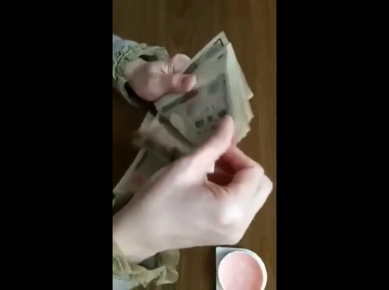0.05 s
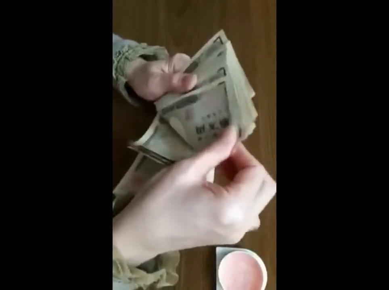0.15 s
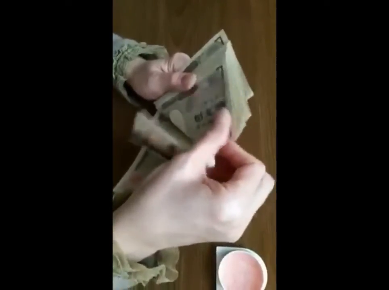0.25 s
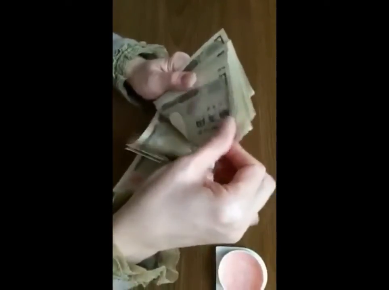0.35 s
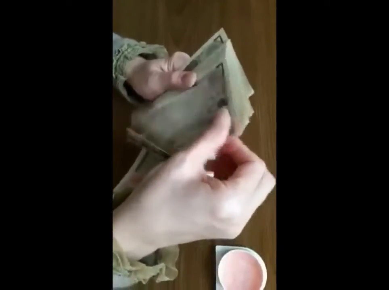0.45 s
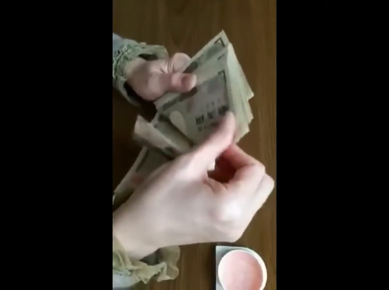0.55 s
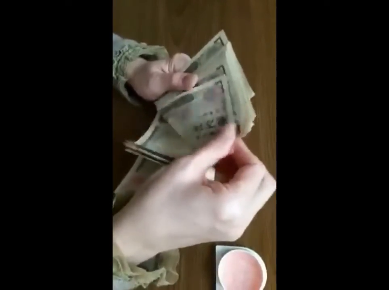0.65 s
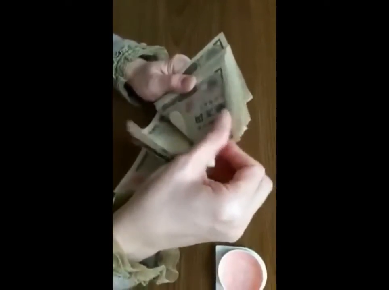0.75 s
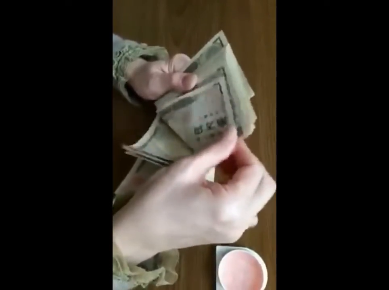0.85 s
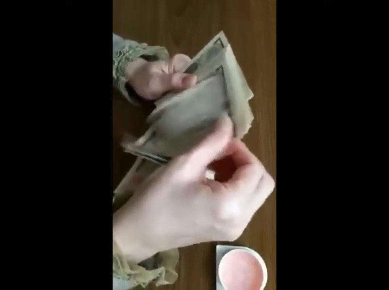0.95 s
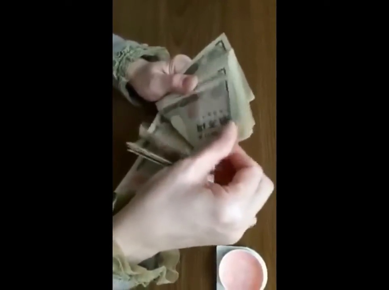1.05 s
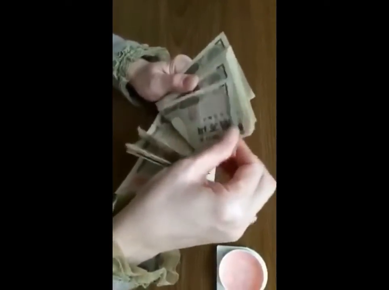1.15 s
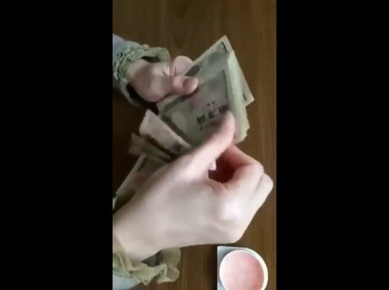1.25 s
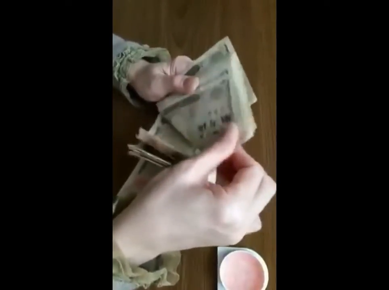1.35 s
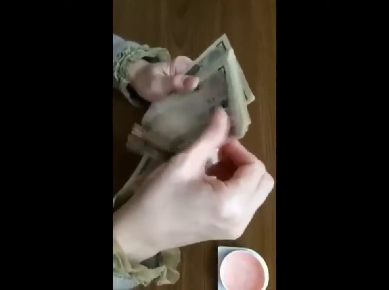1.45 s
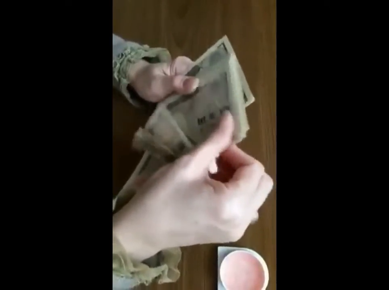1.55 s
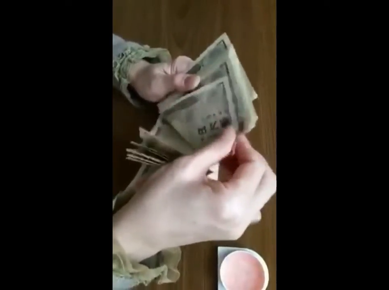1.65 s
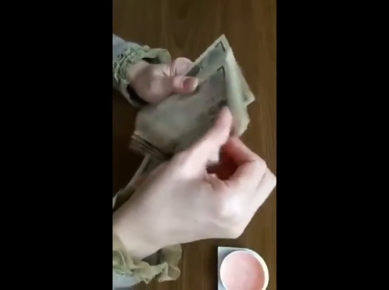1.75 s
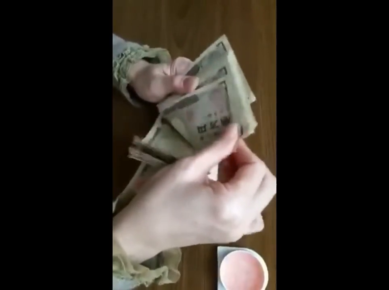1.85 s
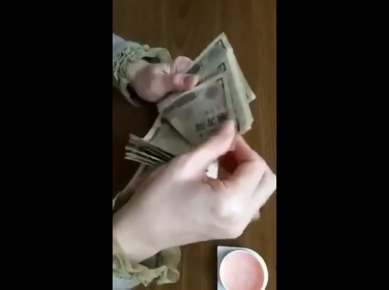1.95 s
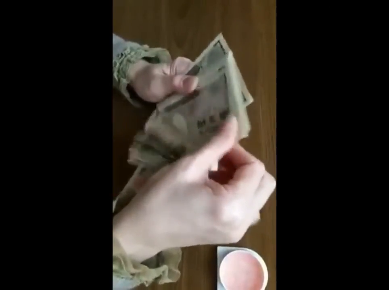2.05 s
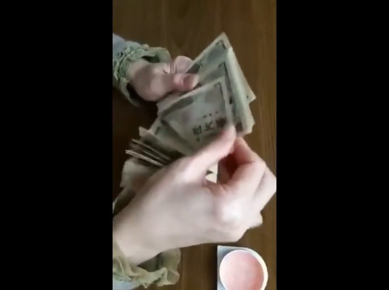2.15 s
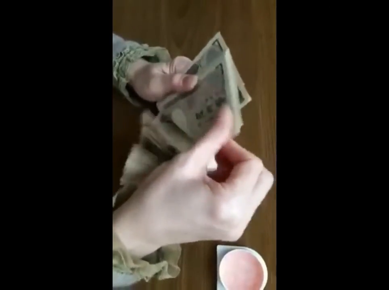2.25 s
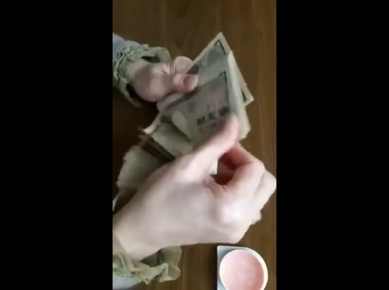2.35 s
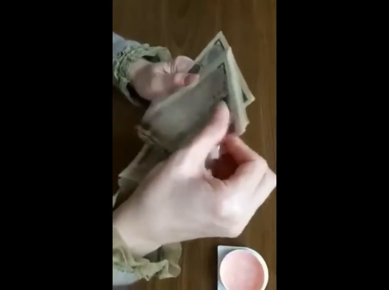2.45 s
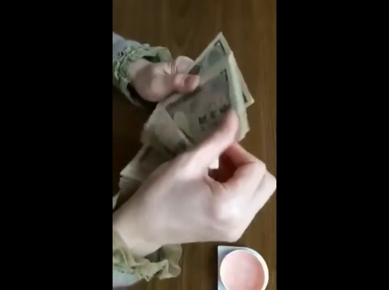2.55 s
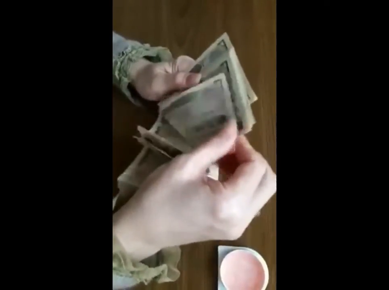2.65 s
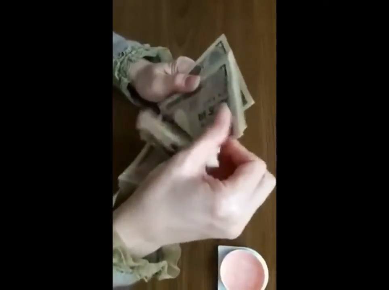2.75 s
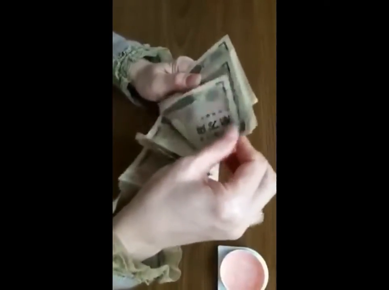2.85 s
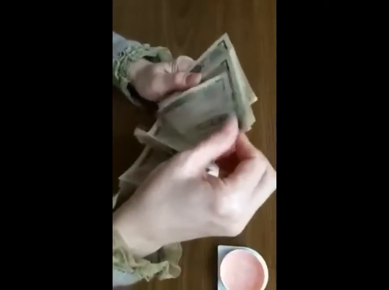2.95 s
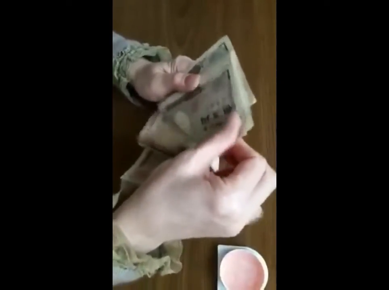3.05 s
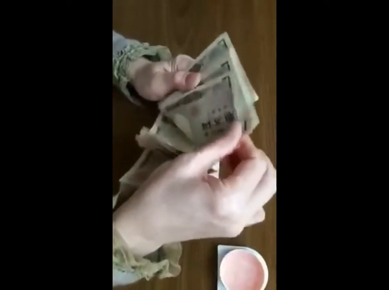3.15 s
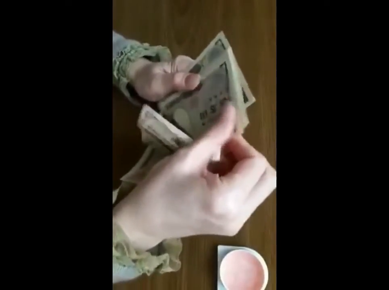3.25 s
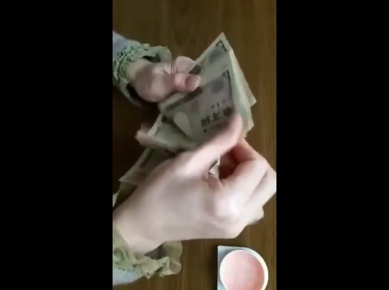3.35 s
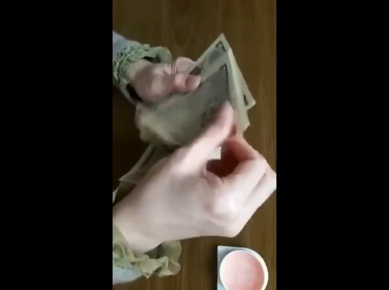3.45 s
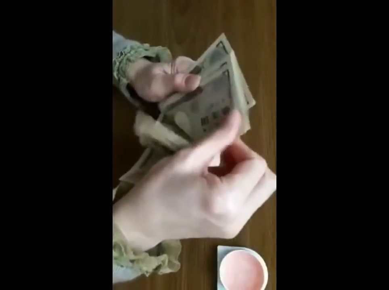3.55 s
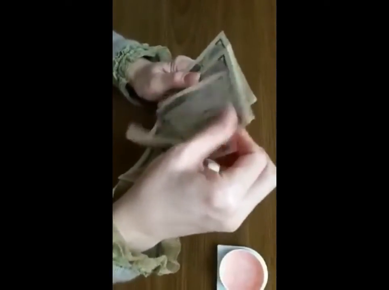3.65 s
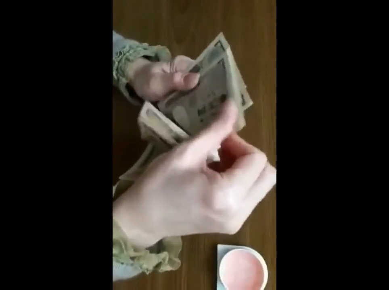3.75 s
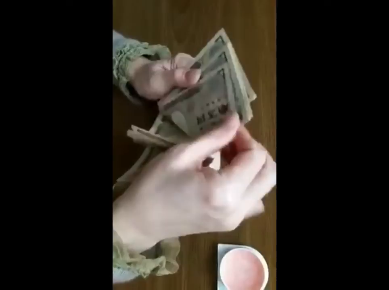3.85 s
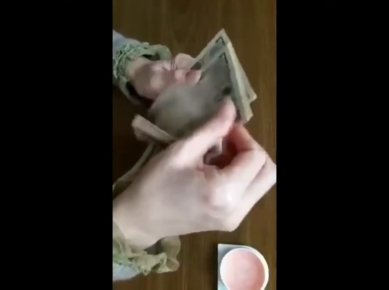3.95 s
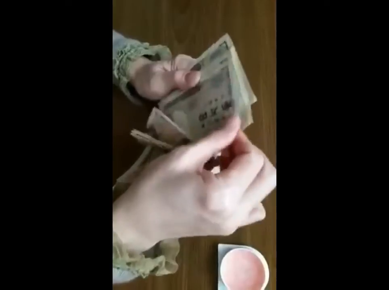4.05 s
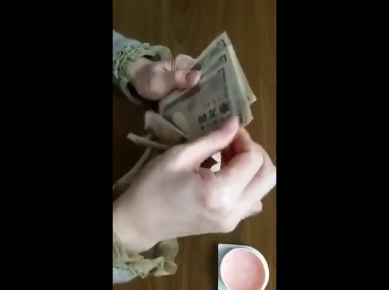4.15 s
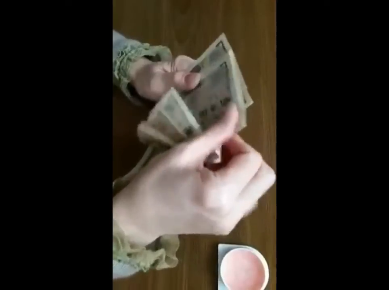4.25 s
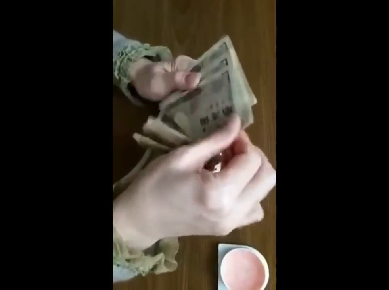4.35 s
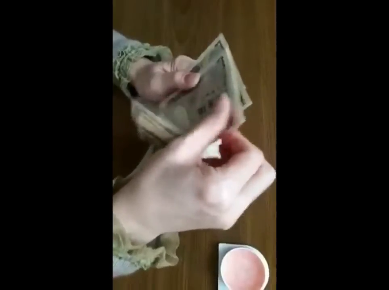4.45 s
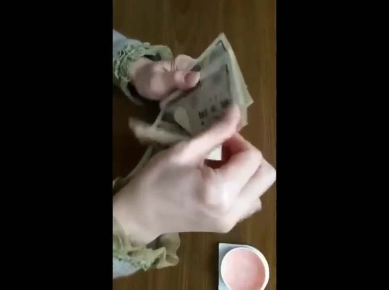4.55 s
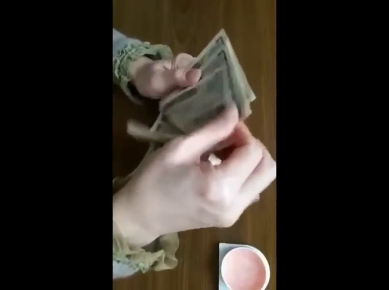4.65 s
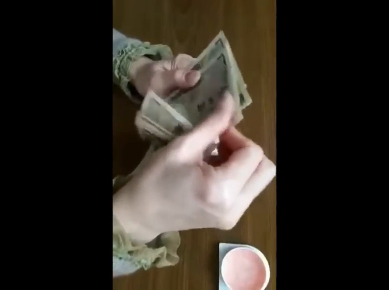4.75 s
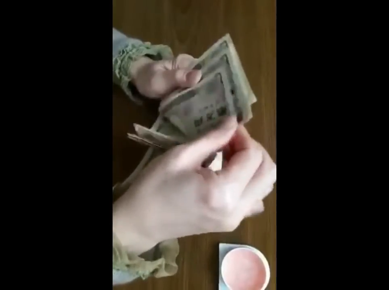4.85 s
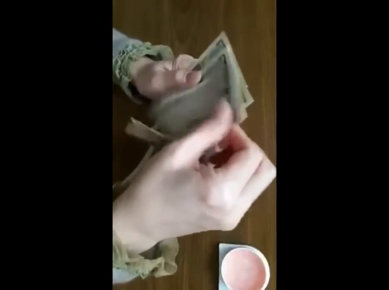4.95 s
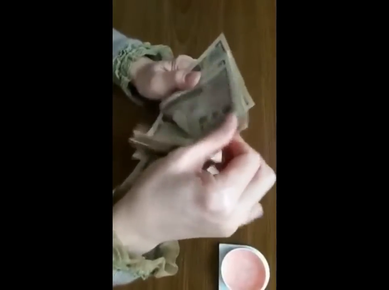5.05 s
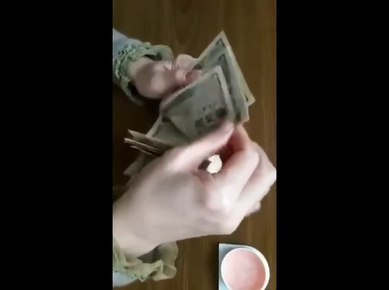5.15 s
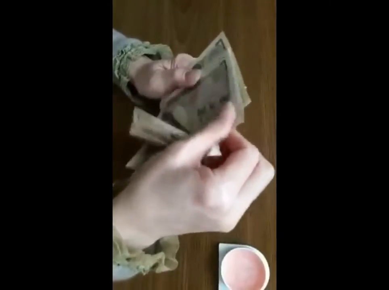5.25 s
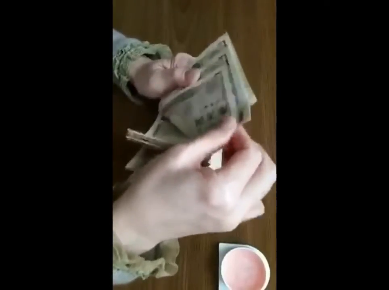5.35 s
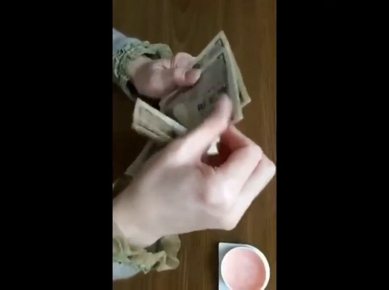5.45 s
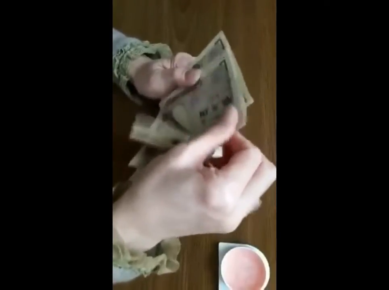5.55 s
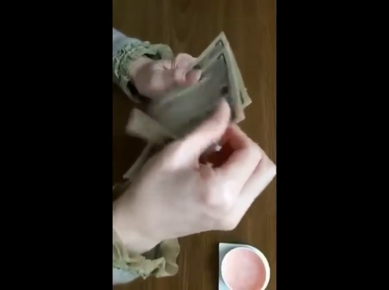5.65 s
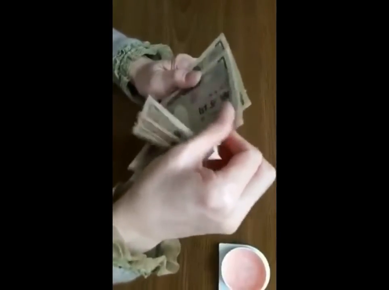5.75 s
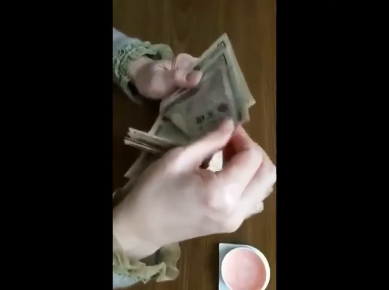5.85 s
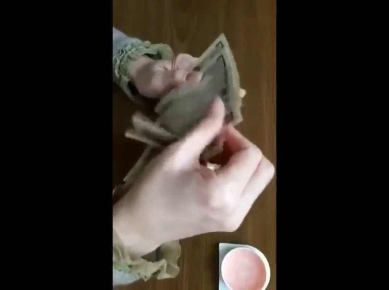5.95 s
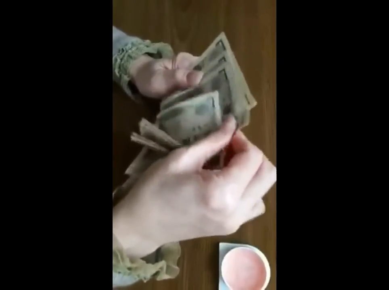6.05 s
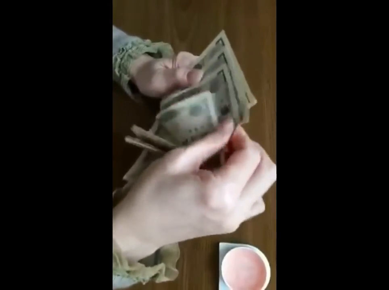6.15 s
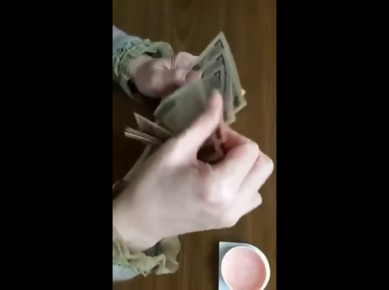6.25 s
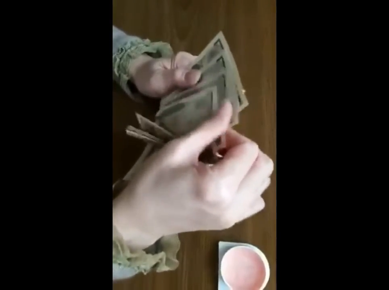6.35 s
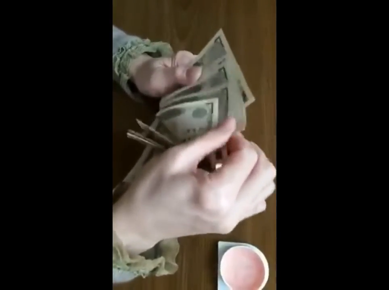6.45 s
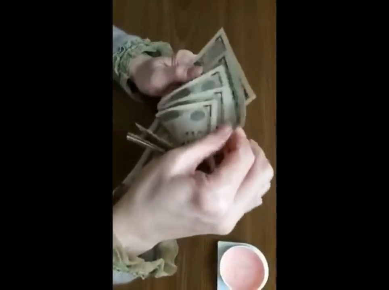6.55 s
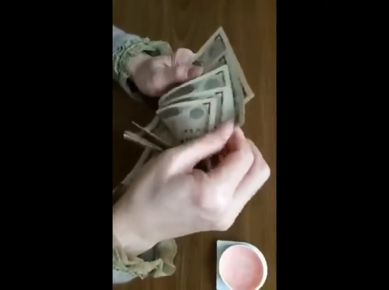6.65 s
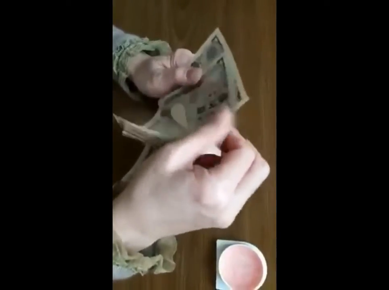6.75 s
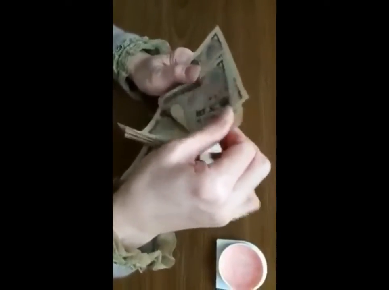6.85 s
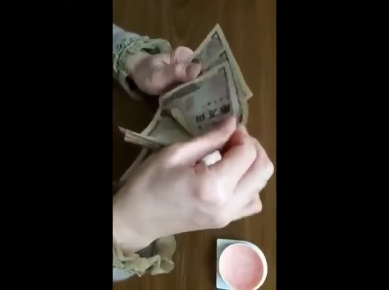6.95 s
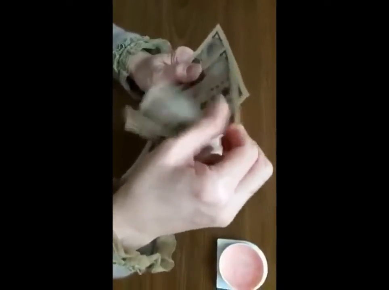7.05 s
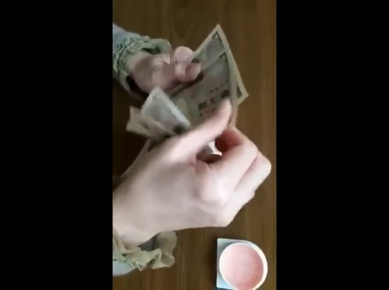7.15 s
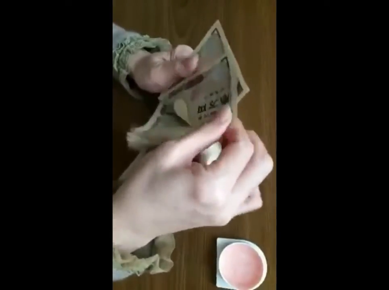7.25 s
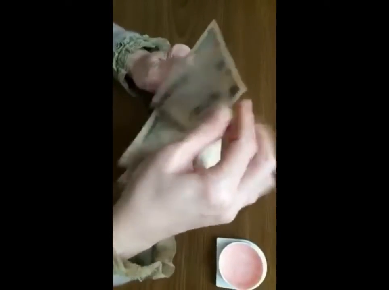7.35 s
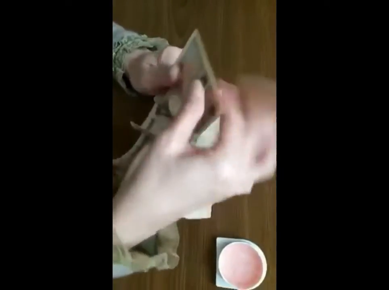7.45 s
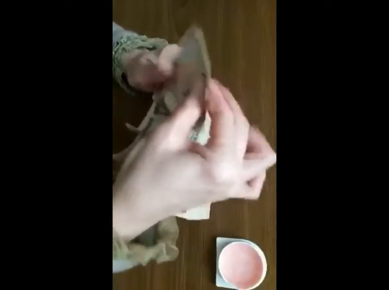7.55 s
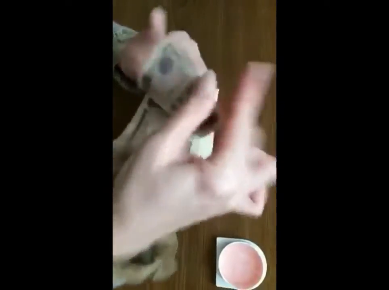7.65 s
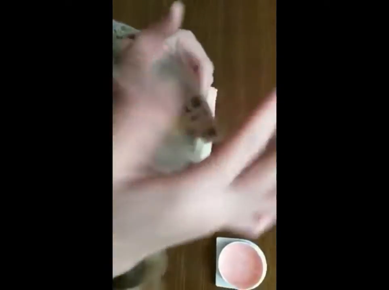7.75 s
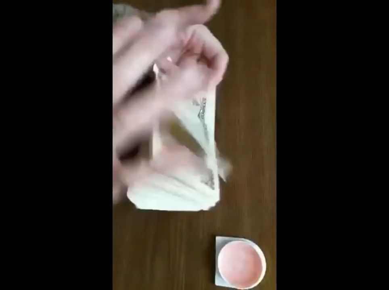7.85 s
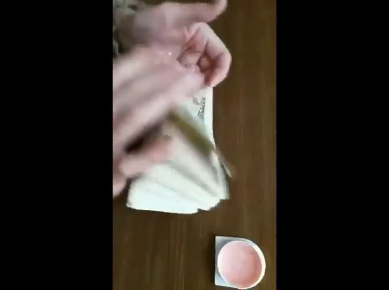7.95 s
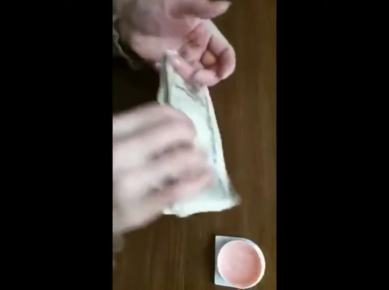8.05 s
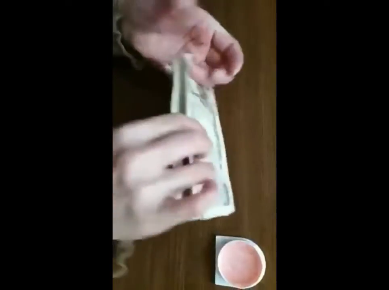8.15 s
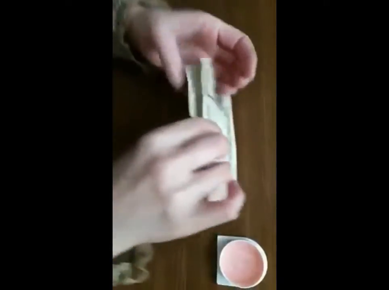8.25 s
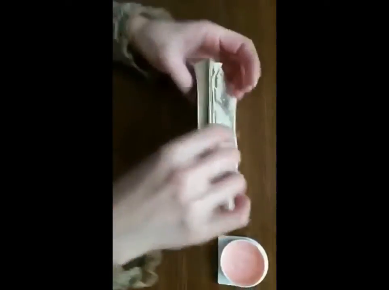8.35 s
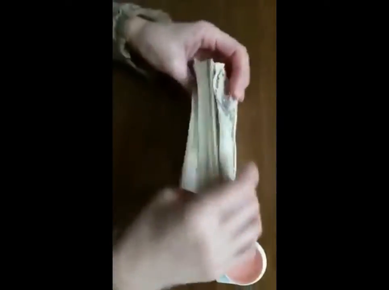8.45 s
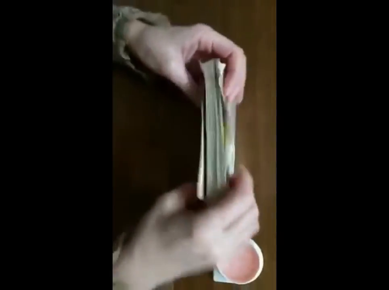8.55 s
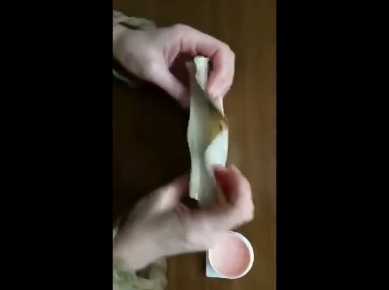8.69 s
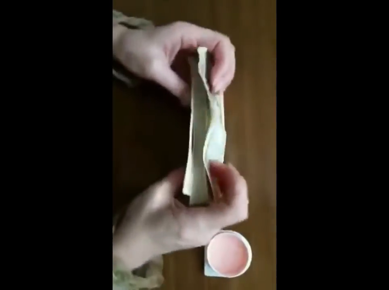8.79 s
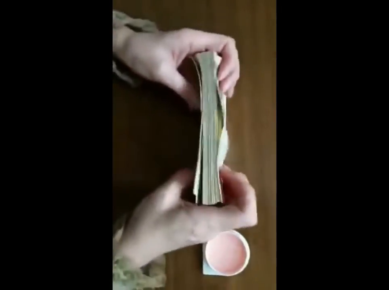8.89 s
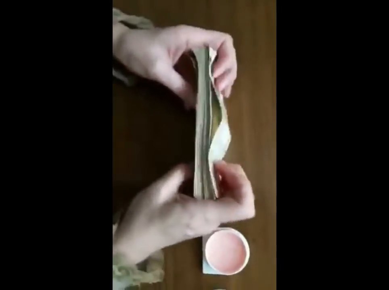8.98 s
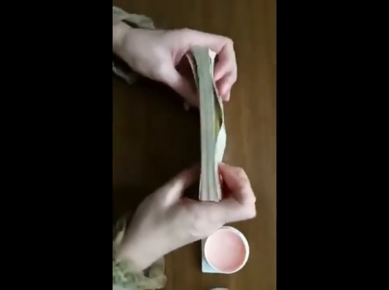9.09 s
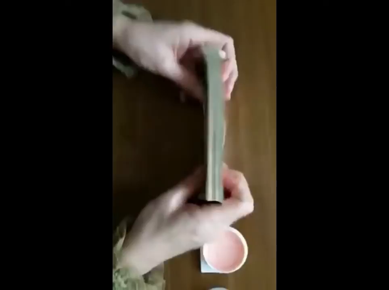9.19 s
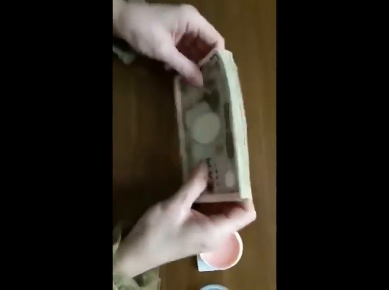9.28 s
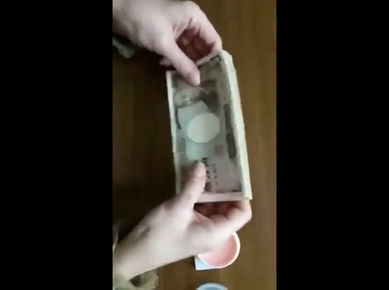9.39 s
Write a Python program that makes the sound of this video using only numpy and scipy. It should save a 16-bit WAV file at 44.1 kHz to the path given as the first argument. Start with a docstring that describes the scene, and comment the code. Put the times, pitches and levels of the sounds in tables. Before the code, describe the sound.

Paper notes are thumbed off a fan in a quick, steady rhythm of dry hisses and dull flexing, dotted with sharp little flicks. After several seconds the rhythm slows, the bundle is slapped together with a loud crackling pop and a puff of air, then its edge is knocked on a wooden table in two short clusters. Close stereo microphone in a small room, hands slightly nearer the left.

```python
"""Banknotes are counted by hand over a wooden table in a small room, about four notes a second.
The thumb slides each note off the fan and draws back: hiss, rasp and dull flexing; notes flick free with pulses.
Then the bundle is slapped together, with pops, crackle and one puff of air,
and its edge is knocked square on the table, whose wooden modes ring.
Hands, sleeves and held paper rub and rustle beneath; decaying noise makes the room's reflections."""
import sys
import numpy as np
from scipy import signal
from scipy.fft import rfft, irfft, next_fast_len
from scipy.io import wavfile

SR = 44100
rng = np.random.default_rng(int(sys.argv[2]) if len(sys.argv) > 2 else 0)


def output_pcm(signal):
    """Save a mono or channel-first signal as 16-bit PCM at the path in sys.argv[1].

    Samples are clipped to [-1, 1] before scaling.
    """
    pcm = np.clip(np.atleast_2d(signal).T, -1, 1) * 32767
    wavfile.write(sys.argv[1], SR, np.round(pcm).astype(np.int16))


N = 415422
RIGHT_LAG_S = 0.00015   # the right port hears the hands later

# The thumb pushes a note off the fan or draws back. Each row: middle of the stroke in seconds,
# hiss in dB before trim, length in seconds, flexing in dB before trim, brightness in dB,
# rasp in dB relative to the usual rasp.
STROKES = [(0.008, -36, 0.048, -48.5, -5, -2), (0.105, -45, 0.071, -48, 1.5, 0),
           (0.23, -42.5, 0.085, -45, 1.5, 2), (0.336, -49.5, 0.096, -57, -2, 2),
           (0.477, -41, 0.071, -49.5, -2.5, 3), (0.598, -44.5, 0.084, -54, -2.5, 1),
           (0.703, -43, 0.084, -46, 1.5, -7), (0.82, -46, 0.067, -53.0, 1.5, 4),
           (0.939, -39.0, 0.062, -40, 2.5, 0.5), (1.076, -43.5, 0.049, -51.5, -3.5, 0.5),
           (1.196, -44, 0.1, -45, 1.5, 2), (1.308, -48.5, 0.085, -50, -0.5, 5),
           (1.437, -43.0, 0.08, -46, -1.0, -1.5), (1.586, -46.5, 0.054, -51, -1, 3),
           (1.699, -44, 0.084, -50, -0.0, -1), (1.844, -45.5, 0.092, -54, 0.5, -0.5),
           (1.961, -45.5, 0.083, -45.5, 3.5, 6), (2.08, -48, 0.083, -53.5, -4, 1),
           (2.221, -48.5, 0.1, -50.0, 2.5, -0.5), (2.334, -45, 0.059, -43, 1.5, -6),
           (2.453, -44.5, 0.1, -49, 2.5, 1.5), (2.598, -45, 0.079, -46, 0, 5),
           (2.717, -42.5, 0.074, -49, -1.5, 4.5), (2.827, -45.5, 0.065, -51, 1, -3),
           (2.946, -40.5, 0.079, -46, -3.5, -4), (3.069, -43, 0.079, -48, 0.0, 0),
           (3.196, -45, 0.096, -49, 1.5, 4), (3.326, -46.0, 0.12, -53, -3, 1),
           (3.461, -43.5, 0.088, -45.5, 1.0, -4), (3.585, -51.5, 0.11, -66, -1, 2.5),
           (3.7, -41.0, 0.064, -45, 1, -5), (3.822, -47.5, 0.11, -50.5, -1, -1),
           (3.933, -41.0, 0.067, -43.5, 0.5, 0.5), (4.038, -45.5, 0.089, -52, -4.5, -2.0),
           (4.168, -44.5, 0.082, -54, -1.5, -4), (4.303, -46.5, 0.087, -50.5, -3, 1.5),
           (4.437, -45.5, 0.098, -46.5, 0.5, -3.5), (4.544, -46, 0.097, -54, -3, -3),
           (4.669, -38.5, 0.067, -45.5, -1, -3), (4.815, -46.5, 0.1, -47, -1.5, -1),
           (4.934, -47.5, 0.068, -51.5, 1.5, 0), (5.047, -38.5, 0.069, -44, -4, -2),
           (5.181, -47, 0.083, -48.5, 2.5, -6), (5.32, -42, 0.086, -50, 0, -5),
           (5.432, -42.5, 0.086, -55, -4, -2), (5.546, -48, 0.075, -47, 3, -2),
           (5.659, -40.5, 0.057, -44, 1, -2), (5.796, -43.5, 0.062, -50.5, 2, -3),
           (5.91, -45.5, 0.073, -50.5, 1.5, -1.0), (6.039, -49.5, 0.075, -52, 4, 6),
           (6.178, -46, 0.038, -64, 3, -5), (6.285, -44.5, 0.075, -55, 2, 5.5),
           (6.434, -42.5, 0.11, -44.0, -12, -2), (6.595, -50.5, 0.17, -53, -10, -8),
           (6.73, -38.5, 0.098, -58, -5.5, -5), (6.868, -50, 0.066, -47, -9, -1),
           (7.126, -43.5, 0.092, -56.5, 1.5, 2.5), (7.36, -54, 0.16, -62, -1, 1),
           (7.51, -47.5, 0.11, -54.5, -1, -1.5)]
# Colour of paper sliding on paper. Each row: frequency in Hz, relative level in dB per Hz.
HISS = [(300, -33), (1000, -8.5), (1800, 2), (2500, 5.5), (3200, 1), (4100, 5), (5500, -1.5), (8000, -4),
        (10000, -11.5)]
# Colour of a bending note. Each row: frequency in Hz, relative level in dB per Hz.
FLEX = [(100, -8.5), (300, -16.5), (600, 1), (1100, 4.5), (1600, 2.5), (2500, -3), (5000, -37),
        (10000, -35.5)]
# Rasp resonance of the sliding note: centre in Hz, width in Hz, usual boost in dB.
RASP = (2400, 710, 0.21)


def sliding_notes(hiss_db=-4.0, flex_db=-5.0, crease_db=1.28, catch_db=1.1, room_db=-3.0, bright_from_hz=5700):
    """Each stroke swells and fades in hiss, rasp and dull flexing; returns two parts of the sheet and their echoes."""
    t = np.arange(N) / SR
    out, echoes = np.zeros((2, 2, N))
    scrapes = [friction(per_s=1100, spread_db=2.5, smooth=0.43) * from_db(crease_db * drift(300)) for part in out]
    hiss = colour(scrapes, HISS)
    flex = colour([friction(per_s=260, spread_db=3.5, smooth=0.3) for part in out], FLEX)
    treble = signal.butter(2, bright_from_hz, "high", fs=SR, output="sos")
    sheen = signal.sosfiltfilt(treble, hiss)
    grip = from_db(catch_db * drift(60))   # the thumb catches and slips within a stroke
    rasp_hz, rasp_width, usual_rasp_db = RASP
    for s, level_db, length, bend_db, bright_db, rasp_db in STROKES:
        near = slice(max(0, int((s - 2 * length) * SR)), int((s + 2 * length) * SR))
        # about 10 dB down at half a length either side of the middle
        speed = grip[near] * np.exp(-((t[near] - s) / length * 2.15) ** 2)
        slide = (hiss - sheen)[:, near] + from_db(bright_db) * sheen[:, near]
        slide = boost(slide, rasp_hz * np.exp(0.084 * rng.normal()), rasp_width, usual_rasp_db + rasp_db)
        bend = from_db(bend_db + flex_db) * flex[:, near]
        note = sheet_colour(speed * (from_db(level_db + hiss_db) * slide + bend))
        out[:, near] += note
        # the fan shifts, so every note finds its own set of reflections
        add(echoes, near.start / SR, from_db(room_db) * room(note.sum(axis=0)))
    return out, echoes


def sheet_colour(x, shape_db=5.5):
    """Every note bends into a shape of its own, with new peaks and dips; the level stays."""
    level = np.std(x)
    for hz in np.geomspace(900, 5000, 5) * np.exp(rng.normal(0, .2, 5)):
        x = boost(x, hz, hz / 5, shape_db * rng.uniform(-2, 1))
    return level * rms_one(x)


def off_the_fan(x, bounce_s=.0006, swing_octaves=.6, share=.4):
    """The sound also bounces off the notes beneath; the gap opens and closes, so its colour sweeps."""
    n = np.arange(N)
    delay = bounce_s * SR * 2 ** (swing_octaves * drift(14))
    bounced = np.interp(n - delay, n, x)
    return (x + share * bounced) / np.hypot(1, share)


# A note flicks free loudly. Each row: time in seconds, pulse peak in dB, pitch in Hz.
FLICKS = [(0.0135, -37, 2600), (0.361, -36, 1410), (0.491, -32, 2360), (0.83, -39, 845), (1.435, -36, 675),
          (1.589, -39, 730), (2.193, -32, 1050), (2.424, -27, 1100), (2.667, -42, 990),
          (2.7985, -26.5, 1310), (2.8003, -53, 1350), (2.8215, -36, 1050), (2.83, -34, 1200),
          (3.0443, -29.5, 1090), (3.058, -34, 1100), (3.154, -41, 1100), (3.193, -33.5, 1100),
          (3.222, -40, 1050), (3.301, -30.5, 1090), (3.441, -33, 1050), (4.304, -35.5, 1010),
          (4.532, -32.5, 1030), (4.618, -35, 1070), (4.682, -37, 1120), (4.785, -26, 1000),
          (4.85, -38, 1100), (5.04, -33, 1200), (5.21, -37, 830), (5.242, -36.5, 1100), (5.545, -34, 755),
          (5.617, -36, 1070), (6.055, -31.5, 935), (6.113, -35, 840), (6.123, -55, 940), (6.188, -29, 2360),
          (6.349, -33, 880), (6.488, -44, 1290), (6.498, -29, 1190), (7.267, -32, 980), (7.348, -43.5, 620)]
# Colour of crackling paper, for ticks and slaps. Each row: frequency in Hz, relative level in dB per Hz.
CRACKLE = [(100, -1), (400, 2.5), (720, 4), (1000, 4.5), (1450, 5), (2000, 4.5), (2700, 4), (3800, 3),
           (5500, -4), (7700, -6.5), (10000, -13)]


def flicking_notes(snap_db=0.0, flutter_db=-17.5, flutter_s=0.0097, tick_db=-11, rebound_db=-11.5,
                   rebound_s=.008, crinkle_db=-19, crinkle_s=0.021):
    """A bending note crinkles, springs straight with a pulse and a tick, then bounces and flutters on the others."""
    t = np.arange(SR // 10) / SR
    snaps, flutter, ticks = np.zeros((3, N))
    for s, level_db, hz in list(FLICKS) + soft_flicks():
        crack = from_db(level_db + snap_db) * snap(hz, cycles=0.8)
        start = s - len(crack) / 2 / SR
        add(snaps, start, crack)
        delays = np.cumsum(rebound_s * rng.uniform(0.285, 1.6, size=3))
        for delay, chance in zip(delays, rng.standard_normal(size=3)):
            # louder rebounds are lower
            rebound = snap(hz * np.exp(-.15 * chance), cycles=0.73)
            add(snaps, start + delay, from_db(level_db + rebound_db + 2 * chance) * rebound)
        lead = t[t < s]
        add(flutter, s - lead[-1], from_db(level_db + crinkle_db) * np.exp(-lead[::-1] / crinkle_s))
        add(flutter, s, from_db(level_db + flutter_db) * np.exp(-t / flutter_s))
        add(ticks, s, from_db(level_db + tick_db) * np.exp(-t / 0.003))
    flutter = colour(flutter * friction(per_s=420, spread_db=1.0, smooth=0.65), FLEX)
    return snaps + flutter + colour(ticks * rng.standard_normal(N), CRACKLE)


def soft_flicks(chance=0.15, usual_db=-54.5, usual_hz=855, scatter_s=0.048, scatter_db=5.5, scatter_octaves=0.26):
    """Some strokes let a corner slip near the height of the movement; returns rows like FLICKS."""
    middles = [row[0] for row in STROKES]
    luck = rng.random(len(middles))
    spread = rng.standard_normal((len(middles), 3))
    flicks = []
    for s, draw, (shift, loud, high) in zip(middles, luck, spread):
        if draw < chance:
            hz = usual_hz * 2 ** (scatter_octaves * high)
            flicks.append((s + scatter_s * shift, usual_db + scatter_db * loud, hz))
    return flicks


def snap(hz, cycles):
    """A pressure pulse 1 high that swells and dies within about the given number of cycles, centred 5 ms in."""
    phase = np.arange(-SR // 200, SR // 200) / SR * hz
    return np.cos(2 * np.pi * phase) * np.exp(-(phase / cycles) ** 2)


# Notes slap together. Each row: time in seconds, pulse in dB, crackle in dB, crackle decay in seconds,
# left over right in dB, room feed in dB, low cut of the crackle in Hz.
SLAPS = [(6.9176, -20.5, -30.5, 0.023, 8, -6, 300), (7.261, -41, -36, 0.019, 2, -6.5, 300),
         (7.6432, -36, -20.5, 0.0015, 11, -5, 900), (7.6467, -26.5, -32, 0.0015, 8, -3, 300),
         (7.726, -30, -37.5, 0.0023, 4, 2.5, 600), (7.7371, -25, -24, 0.0028, 8.5, -13.5, 302),
         (7.8202, -19, -9, 0.0042, 6.5, -3, 118), (7.868, -46, -29, 0.014, 2, -8, 1000),
         (8.043, -53, -52.5, 0.0027, 3, 2.5, 2000), (8.178, -43, -32.5, 0.0026, 17, -1.5, 900),
         (8.237, -57, -50, .002, 0, -11, 1200), (8.2804, -39, -47.5, 0.014, -7, -4, 300),
         (8.308, -55, -39.5, 0.0024, -6, -5, 2500)]
# A harder slap closes a wider patch and sounds lower: the pitch at a usual level, and dB per octave down.
SLAP_HZ, SLAP_DB, SLAP_DB_PER_OCTAVE = 925, -26, 22


def slapping_notes(rise_s=0.00096, brush_db=-11, brush_s=0.00087, touch_s=0.0037, touch_db=-37, touch_decay_s=0.0025):
    """Sheets brush, then meet flat with a pressure pulse and crackle; returns direct sound and room feed."""
    t = np.arange(SR // 10) / SR
    direct, feed = np.zeros((2, N)), np.zeros(N)
    crack = colour(signal.unit_impulse(len(t)), CRACKLE)[0, :len(t)]
    grains = friction(per_s=3000, spread_db=2.0, smooth=.5)
    since_touch = np.r_[-t[::-1], t] + touch_s
    touch = (since_touch > 0) * np.exp(-np.abs(since_touch) / touch_decay_s)
    for s, pulse_db, crackle_db, decay, pan_db, room_db, low_hz in SLAPS:
        thin = signal.butter(1, low_hz, "high", fs=SR)   # a small patch of paper radiates little bass
        brush = from_db(brush_db) * np.exp(-t[::-1] / brush_s)
        impact = np.exp(-t / decay) * (1 - np.exp(-t / rise_s))
        force = from_db(crackle_db) * np.r_[brush, impact]
        if crackle_db > touch_db:   # only the firm slaps come corner first
            force = np.hypot(force, from_db(touch_db) * touch)
        burst = force * np.roll(grains, rng.integers(N))[:len(force)]
        burst = rms_one(burst) * np.std(force)
        crackle = signal.lfilter(*thin, colour(burst, CRACKLE)[0, :len(force)])
        pop_hz = SLAP_HZ * 2 ** ((SLAP_DB - pulse_db) / SLAP_DB_PER_OCTAVE)
        pop = from_db(pulse_db) * pulse(pop_hz, cycles=1.0)
        left, right = pan(pan_db) * (np.r_[0 * t, pop] + crackle)
        add(direct[0], s - t[-1], left)
        add(direct[1], s - t[-1] + RIGHT_LAG_S, right)
        # the room is fed one even crack with the energy of the crackle, so its reflections stay smooth
        even_crack = np.linalg.norm(force) * signal.lfilter(*thin, crack)
        add(feed, s, from_db(room_db) * (pop + even_crack))
    return direct, feed


# The hollow between palms and bundle. Each row: resonance in Hz, width in Hz, boost in dB.
PALM_MODES = [(718, 49, 2.2), (1970, 160, 3.7), (2380, 170, 3.8), (3480, 160, 4.4), (4450, 160, 4)]


def palm_ring(x):
    """The hollow between palms and bundle rings at its resonances."""
    for mode in PALM_MODES:
        x = boost(x, *mode)
    return x


# The hardest slap squeezes air out at the microphone: peak in dB, push length in seconds, left over right in dB.
PUFF = (-18.5, 0.0017, 30.6)


def air_puff(travel_s=0.0016):
    """A short push of air and a longer, weaker suction, close to the left port."""
    level_db, push_s, pan_db = PUFF
    s = max(SLAPS, key=lambda slap: slap[1])[0]
    out = np.zeros((2, N))
    age = 2 * np.arange(SR // 10) / SR / push_s
    swing = age * (2 - age) * np.exp(-age)   # turns to suction when the push length is over
    add(out, s + travel_s, from_db(level_db) * pan(pan_db) * swing / swing.max())
    return out


# The bundle lands on the table. Each row: time in seconds, knock in dB, contact cut-off in Hz,
# sheet edges in dB, reflections in dB.
TAPS = [(8.316, -40, 590, -68, 2.5), (8.448, -42, 202, -65, -12), (8.5036, -13.5, 560, -30.5, -3),
        (8.52, -30, 596, -42, -1), (8.538, -31.5, 400, -41.5, -0.5), (8.558, -45, 600, -42.5, -2),
        (8.686, -36, 343, -47.5, -1), (9.017, -41, 597, -74, 11), (9.031, -18.5, 1810, -17.5, -2),
        (9.045, -23.5, 1850, -25, -1.5), (9.072, -29.5, 1500, -31.5, -1), (9.18, -37, 1200, -38.5, -1),
        (9.188, -25.5, 1810, -31.5, -3), (9.284, -29, 604, -38, 7), (9.2932, -15, 400, -32, -1),
        (9.3, -18.5, 2200, -24.5, -6), (9.304, -19.5, 2420, -18, -5.5), (9.317, -26.5, 2000, -32, 1),
        (9.337, -37, 1200, -42, -3), (9.356, -18, 170, -55, -11)]
# Colour of sheets landing edge-on. Each row: frequency in Hz, relative level in dB per Hz.
EDGES = [(100, -1), (400, -4.5), (780, -3.5), (1250, 1.5), (1700, -4.5), (2100, -7.5), (2500, -7.5),
         (3400, -8), (4300, -14), (6000, -20.5), (8000, -23), (10000, -33.5)]


def tapping_stack(lowest_hz=72, edges_room_db=6.0, edge_spread_s=0.0017):
    """The bundle knocks the table into its modes; loose sheets land in clusters just after, each tap with echoes."""
    t, out = np.arange(SR // 3) / SR, np.zeros((2, N))
    contacts = friction(per_s=800, spread_db=2.5, smooth=.25)
    landing = t / edge_spread_s * np.exp(1 - t / edge_spread_s)
    for s, knock_db, contact_hz, edges_db, room_db in TAPS:
        contact = signal.butter(2, contact_hz, fs=SR)
        knock = from_db(knock_db) * signal.lfilter(*contact, table_knock())
        sheets = landing * np.roll(contacts, rng.integers(N))[:len(t)]
        sheets = rms_one(sheets) * np.std(landing)
        edges = from_db(edges_db) * colour(sheets, EDGES)[0, :len(t)]
        add(out, s, knock + edges)
        reflected = room(knock + from_db(edges_room_db) * edges, build_s=0.0012)
        add(out, s, from_db(room_db) * reflected)
    low_cut = signal.butter(2, lowest_hz, "high", fs=SR, output="sos")
    return signal.sosfilt(low_cut, out + 1e-18)


# Modes of the table top. Each row: usual frequency in Hz, level in dB before trim, 60 dB decay in seconds.
TABLE_MODES = [(146.5, -2, 0.14), (210, -2.5, 0.14), (271, -5, 0.08), (328, -6.5, 0.11), (439, 1, 0.075),
               (520.5, 0, 0.1), (622, 2, 0.055), (718, 0, 0.095), (865, -1, 0.058), (1068, -6, 0.055),
               (1246, 3, 0.061), (1388, 4, 0.066), (1600, 3, 0.091), (1927, -1.5, 0.1), (2094, 3, 0.11),
               (2570, -7, 0.045)]


def table_knock(ring_db=-10.5, spot_db=0.5, detune=0.016, thud_hz=500, thud_db=-7.5, bulk_hz=170, bulk_db=-7.0):
    """Each knock meets another spot under the bundle, so the modes vary; beneath them a quickly damped thud."""
    t = np.arange(SR // 3) / SR
    wood = np.zeros(len(t))
    for k, (hz, db, t60) in enumerate(TABLE_MODES):
        decay = from_db(db + ring_db + spot_db * rng.normal() - 60 * t / t60)
        ring = np.sin(2 * np.pi * hz * (1 + detune * rng.normal()) * t)
        wood += decay * ring * (-1) ** k
    thud = from_db(thud_db) * pulse(thud_hz, cycles=0.82)
    bulk = from_db(bulk_db) * pulse(bulk_hz, cycles=1.0)
    add(wood, 0, -thud - bulk)
    return wood


# Hands, sleeves and the held bundle. Each row: time in seconds, low rubbing in dB, rustle in dB before trim.
HANDLING = [(0, -55.5, -56), (2.8, -56, -52), (3.1, -52.5, -54.5), (3.4, -55, -52.5), (6.3, -55.5, -47),
            (6.85, -56, -49), (7.6, -54.5, -51.5), (7.851, -55.5, -63.5), (8.149, -63, -62),
            (8.33, -54.5, -57), (8.44, -69, -68), (8.65, -61, -59), (8.85, -57, -52.5), (9.0, -57.5, -55),
            (9.42, -47, -68)]
# Colour of the held paper. Each row: frequency in Hz, relative level in dB per Hz.
RUSTLE = [(100, -10), (400, -2), (1200, 2), (1800, 1), (2600, 1.5), (4000, -4.5), (6000, -10.5),
          (10000, -18.5)]
# Colour of sleeves and fingers. Each row: frequency in Hz, relative level in dB per Hz.
RUBBING = [(20, -2.5), (50, -6.5), (90, 1.5), (120, -4), (150, 3.5), (200, -1), (250, 3.5), (320, -8),
           (400, -2), (550, -12), (1200, -14), (5000, -51)]


def handling():
    """Sleeves and fingers rub with a dull rumble, and the held notes never stop rustling."""
    s, *levels = np.transpose(HANDLING)
    rub, rustle = [from_db(np.interp(np.arange(N) / SR, s, db)) for db in levels]
    surround = diffuse(next_fast_len(N))[:, :N]
    rumble = colour(surround * rub * from_db(1.34 * drift(25)), RUBBING)
    unsteady = from_db(-7.0 + 5.22 * drift(35))
    paper = colour(rustle * unsteady * friction(per_s=600, spread_db=2.5, smooth=1.0), RUSTLE)
    return rumble, paper


# Decay of the room. Each row: frequency in Hz, 60 dB decay in seconds.
ROOM_T60 = [(150, 0.19), (500, 0.19), (2000, 0.27), (5000, 0.24), (10000, 0.25)]


def room(x, build_s=0.00033, size=11025, spread_db=3.5, merge_s=.06):
    """Reflections build up, uneven at first, then merge and die away band by band."""
    t, hz = np.arange(size) / SR, np.fft.rfftfreq(size - 1, 1 / SR)
    knots = t[::SR // 500]
    chance = np.interp(t, knots, rng.standard_normal(len(knots)))
    uneven = from_db(spread_db * np.exp(-t / merge_s) * chance)
    noise, tail = rfft(diffuse(size)), 0
    centres, t60s = np.transpose(ROOM_T60)
    for share, t60 in zip(np.eye(len(centres)), t60s):
        band = irfft(noise * np.interp(np.log(hz + 1), np.log(centres), share), size)
        tail = tail + band * from_db(-60 * t / t60)
    build_up = 1 - np.exp(-t / build_s)
    return convolve(x, rms_one(tail * uneven * build_up) / np.sqrt(size))


def diffuse(size, port_spacing_s=0.00045):
    """Noise arriving from all sides: alike at both ports in the bass, unrelated in the treble."""
    alike = .97 * np.sinc(2 * np.fft.rfftfreq(size, 1 / SR) * port_spacing_s)
    mid, side = rfft(rng.standard_normal((2, size)))
    return irfft(np.sqrt(1 + alike) * mid + np.sqrt(1 - alike) * side * [[1], [-1]], size) / np.sqrt(2)


def friction(per_s, spread_db, smooth):
    """Fibres catch and slip: clicks of uneven size over a smooth hiss."""
    sizes = from_db(spread_db * np.minimum(rng.exponential(1, N), 4)) * rng.choice([-1, 1], N)
    clicks = rms_one(sizes * (rng.random(N) < per_s / SR))
    return rms_one(clicks + smooth * rng.standard_normal(N))


def pulse(hz, cycles):
    """A damped sine about 1 high that falls by 1/e in the given number of cycles."""
    phase = np.arange(SR // 10) / SR * hz
    return np.sin(2 * np.pi * phase) * np.exp(-(phase - 1 / 4) / cycles)


def drift(rate):
    """A random wander of rms 1 through the given number of new values a second."""
    knots = rng.standard_normal(N // 40)
    return rms_one(np.interp(np.arange(N) / SR * rate, np.arange(len(knots)), knots))


def boost(x, hz, width, db):
    """One resonance lifts the sound around its centre, or dips it if the dB are negative."""
    resonance = signal.iirpeak(hz, hz / width, fs=SR)
    return x + (from_db(db) - 1) * signal.lfilter(*resonance, x + 1e-18)


def moving_resonance(x, hz, width, db, count=7, swing_octaves=.12):
    """A peak or dip in the colour wanders around its usual centre."""
    position, stops = np.tanh(drift(9)), np.linspace(-1, 1, count)
    out = 0
    for stop, share in zip(stops, np.eye(count)):   # crossfade between fixed tunings
        tuned = boost(x, hz * 2 ** (swing_octaves * stop), width, db)
        out = out + np.interp(position, stops, share) * tuned
    return out


def colour(x, spectrum, size=4096):
    """Causal filter with the given spectrum; white noise keeps its level."""
    gain = rms_one(from_db(at_hz(spectrum, np.fft.rfftfreq(size, 1 / SR))))
    # folding the cepstrum forward in time gives minimum phase
    cepstrum = irfft(np.log(gain))
    cepstrum[1:size // 2] *= 2
    cepstrum[size // 2 + 1:] = 0
    return convolve(x, irfft(np.exp(rfft(cepstrum))))


def at_hz(points, hz):
    """Read a spectrum between its points along a log frequency axis."""
    points = np.array(points)
    return np.interp(np.log(hz + 1), np.log(points[:, 0]), points[:, 1])


def convolve(x, response):
    """Pass a sound, or each of its channels, through an impulse response."""
    return signal.fftconvolve(np.atleast_2d(x), np.atleast_2d(response), axes=-1)[:, :N]


def from_left(x, lag_s, pan_db):
    """The hands are nearer to the left port: the right one hears them later."""
    n, x = np.arange(N), np.ravel(x)
    return np.array([x, np.interp(n - lag_s * SR, n, x)]) * pan(pan_db)


def pan(db):
    """Left and right gains that differ by the given dB."""
    return from_db(np.array([[db], [-db]]) / 2)


def add(track, s, sound):
    """Mix a sound in from time s on."""
    start = max(0, round(s * SR))
    track[..., start:start + sound.shape[-1]] += sound[..., :N - start]


def from_db(db):
    """Turn dB into an amplitude factor."""
    return 10 ** (np.asarray(db) / 20)


def rms_one(x):
    """Scale to an rms of 1."""
    return x / np.sqrt(np.mean(x ** 2) + 1e-20)


# The cupped hand opens towards the left port: usual centre in Hz, width in Hz, boost in dB.
HAND_HOLLOW = (2450, 140, 5)
# Wandering dip in the colour of the counting: usual centre in Hz, width in Hz, level in dB.
COUNTING_DIP = (1782, 275, -8.5)


def scene(tip_db=-6.0, tip_lag_s=0.000294):
    """Counting, slapping and tapping, each with its reflections, over the rub of hands and sleeves."""
    rumble, rustle = handling()
    # a note is wide: the part under the thumb and the free tip sound from different directions
    (under_thumb, tip), echoes = sliding_notes()
    flicks = flicking_notes()
    slaps, slap_feed = slapping_notes()
    paper = from_left(off_the_fan(under_thumb + rustle[0]) + flicks, RIGHT_LAG_S, pan_db=1.5)
    paper = paper + from_left(from_db(tip_db) * off_the_fan(tip), tip_lag_s, pan_db=2.5)
    paper[0] = moving_resonance(paper[0], *HAND_HOLLOW)
    counting = paper + echoes + from_db(-1) * room(rustle) + from_db(-10.5) * room(flicks)
    counting = moving_resonance(counting, *COUNTING_DIP)
    slapping = palm_ring(slaps + room(slap_feed, build_s=0.017))
    return counting + slapping + air_puff() + tapping_stack() + rumble


# Resonances of the microphone ports, one list for the left and one for the right.
# Each row: centre in Hz, width in Hz, boost in dB.
PORTS = [
    [(7740, 1170, 6), (5350, 1100, -2)],
    [(9030, 270, 11), (6900, 1200, -1)],
]


def record(dry, clip_level=.85, cutoff_hz=10150):
    out = dry.copy()
    for side, resonances in enumerate(PORTS):
        for resonance in resonances:
            out[side] = boost(out[side], *resonance)
    clipped = np.clip(out, -clip_level, clip_level)
    top_cut = signal.ellip(12, .3, 110, cutoff_hz, fs=SR, output="sos")
    return signal.sosfilt(top_cut, clipped)


dry = scene()
out = record(dry)
output_pcm(out)
```